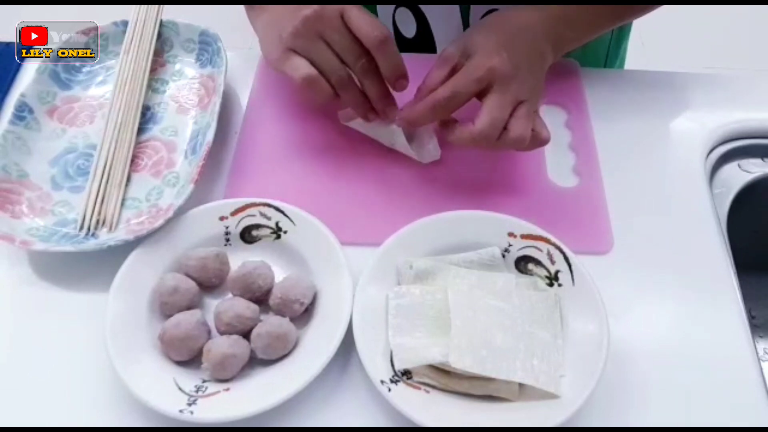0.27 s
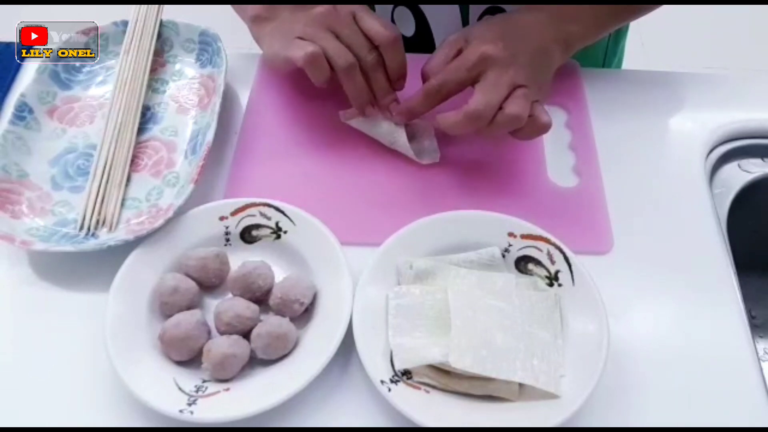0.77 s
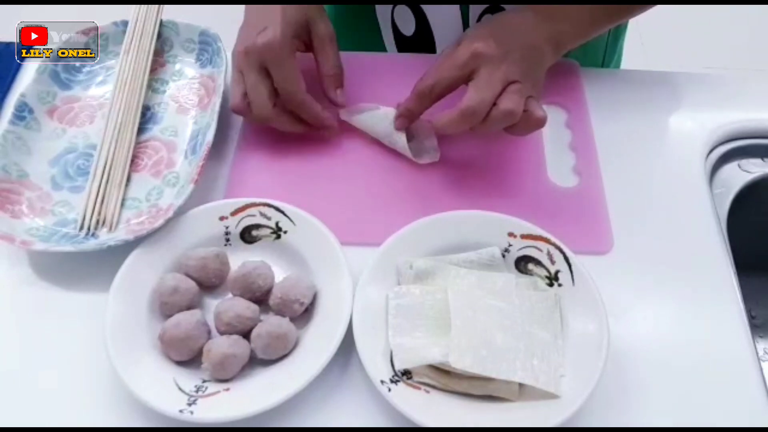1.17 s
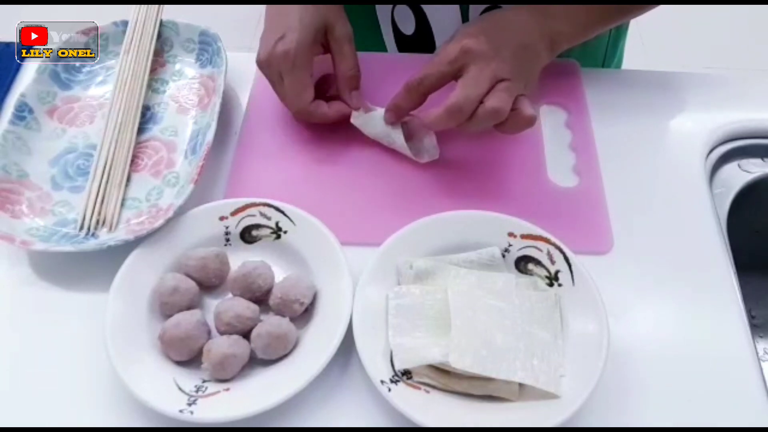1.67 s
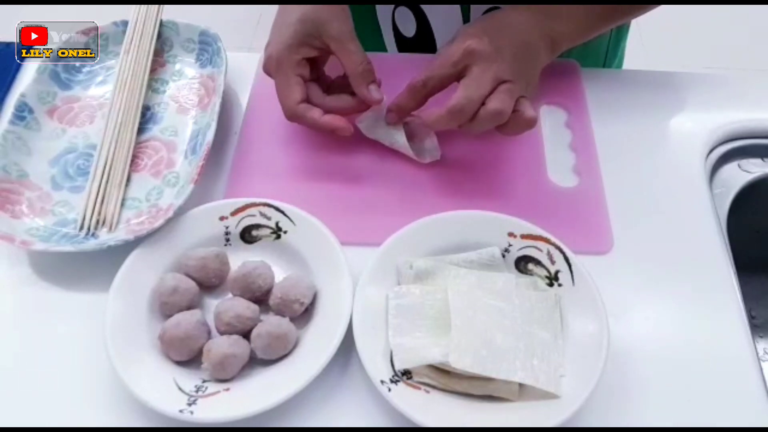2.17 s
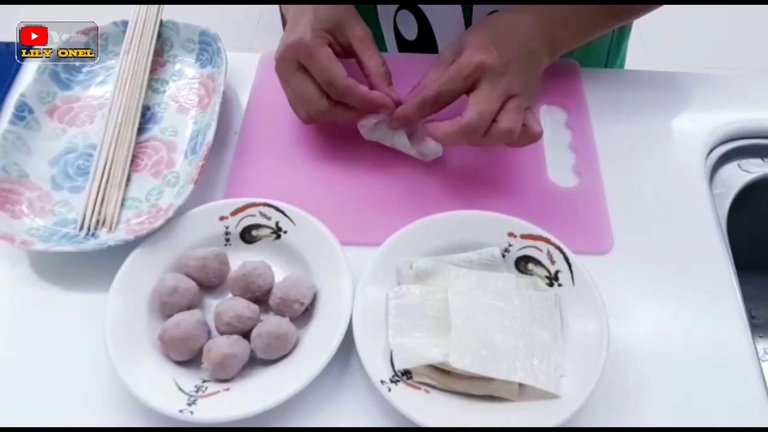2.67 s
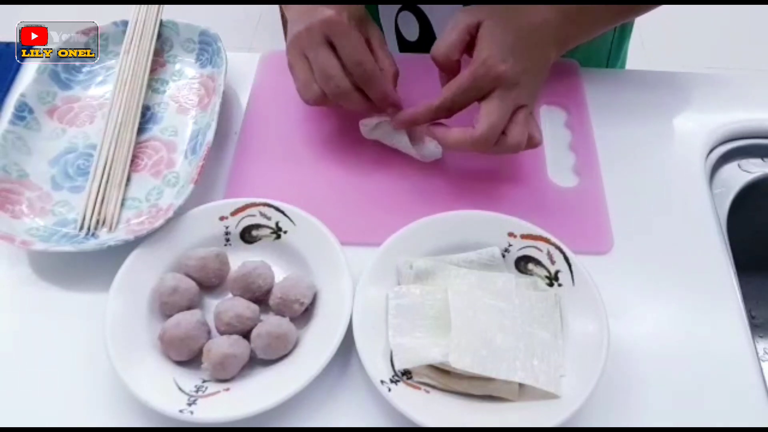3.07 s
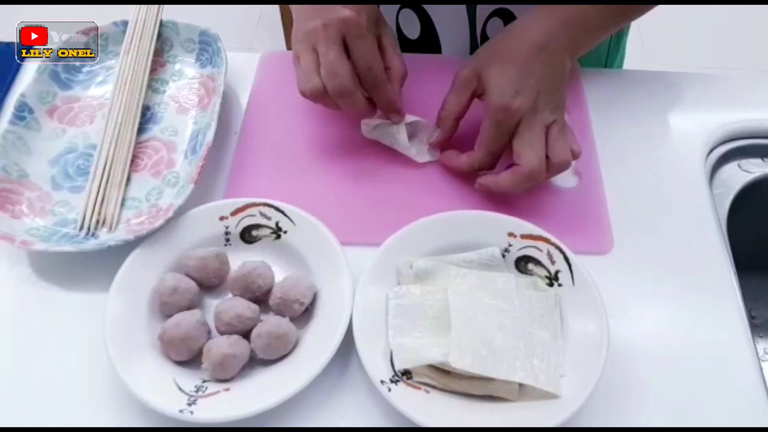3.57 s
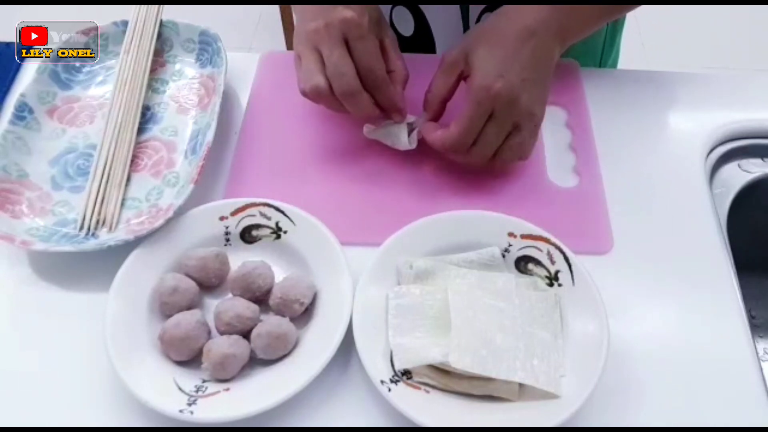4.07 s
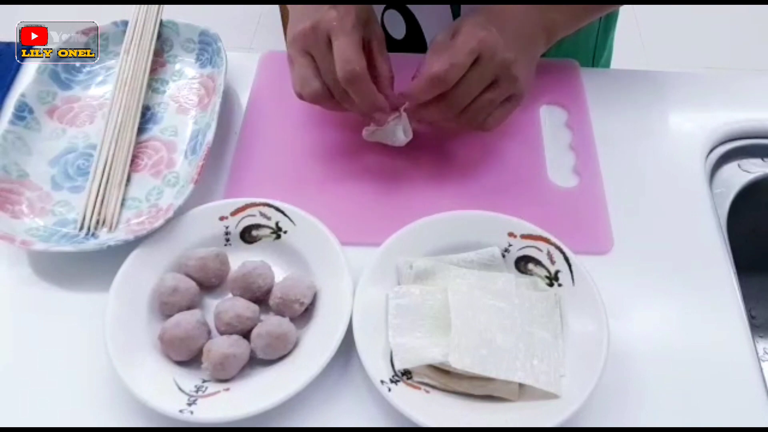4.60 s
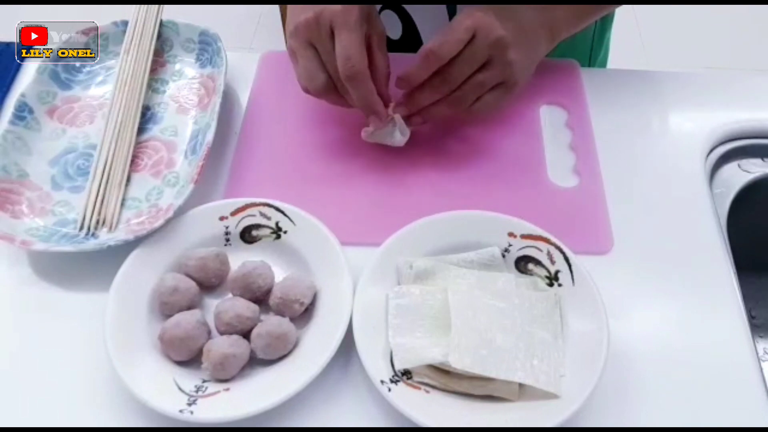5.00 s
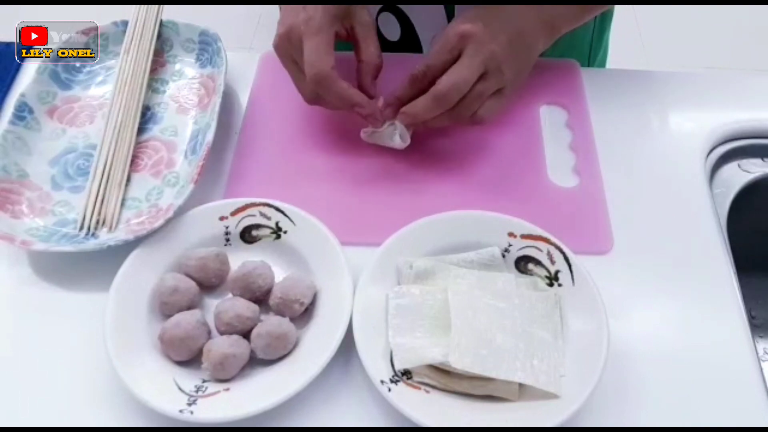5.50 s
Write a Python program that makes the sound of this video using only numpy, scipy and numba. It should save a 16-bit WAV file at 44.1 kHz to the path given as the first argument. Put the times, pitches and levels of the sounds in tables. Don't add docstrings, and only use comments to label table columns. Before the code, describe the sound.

Deep continuous fridge drone with a faint buzzy edge, broken by a few light bracelet taps on a counter and barely audible hand rustle.

```python
import sys
import numpy as np
from scipy import signal
from scipy.fft import rfft, irfft
from scipy.io import wavfile
from scipy.ndimage import uniform_filter1d
from numba import njit

SR = 44100
rng = np.random.default_rng(int(sys.argv[2]) if len(sys.argv) > 2 else 0)


def level_to_linear(level):
    exponent = np.asarray(level, float) / 20
    return 10 ** exponent


def digitize_waveform(pressure):
    field = np.atleast_2d(pressure).T
    bounded = np.clip(field, -1, 1)
    quanta = np.round(bounded * 32767).astype(np.int16)
    wavfile.write(sys.argv[1], SR, quanta)


N = 253310


def along(hz, table, column):
    rows = np.array(table)
    return np.interp(np.log(hz), np.log(rows[:, 0]), rows[:, column])


def swell(s, rise_s, fall_s):
    t = np.arange(N) / SR - s
    return np.where(t < 0, np.exp(-(t / rise_s) ** 2), np.exp(-np.abs(t) / fall_s))


def spread(pan_db):
    return level_to_linear(np.array([[pan_db], [-pan_db]]) / 2)


def tone(left_db, right_db, lead_rad, phase_rad, unrest, wander_hz=7.):
    marks = rng.standard_normal((2, 100))
    wander = 1 + unrest * (marks[0] + 1j * marks[1])
    start = np.sqrt(2) * np.exp(1j * phase_rad)
    left = start * level_to_linear(left_db)
    right = start * level_to_linear(right_db) * np.exp(1j * lead_rad)
    return wander, wander_hz / SR, left, right


@njit
def add(out, spin, wander, step, left, right):
    for i in range(len(spin)):
        j = int(i * step)
        z = spin[i] * (wander[j] + (wander[j + 1] - wander[j]) * (i * step - j))
        out[0, i] += (left * z).real
        out[1, i] += (right * z).real


def air(lag_s=0.000382):
    # Hz, left in dB per Hz, right in dB per Hz, likeness of the ports 0-1.
    broad = [(20, -75, -75, 0.7), (50, -65, -64, 1), (90, -65, -65, 0.95), (139, -60.5, -60, 1),
             (216, -66, -69, 0.9), (285, -77, -75, .9), (510, -82, -85, 0.4), (794, -83, -87.5, 0.6),
             (1040, -82, -86.5, 0.33), (1300, -83.5, -90, 0.1), (2090, -90, -91, 0), (3080, -97, -100, 0.6),
             (7560, -103, -107, 0), (15000, -100, -100, 0.2)]
    # Hz, width in Hz, left in dB per Hz, right in dB per Hz.
    resonances = [(106, 6, -50, -51), (140.5, 5, -54, -55), (146.8, 3, -52, -52), (158, 7, -52, -54),
                  (167, 6, -59, -61), (201, 7, -63, -63), (212, 6, -66, -66), (233, 12, -64, -68),
                  (254, 9, -64, -67), (277, 3, -68, -74), (322.5, 3, -62, -64), (328, 14, -67, -72),
                  (336, 3, -69, -78), (359.8, 2, -78, -65), (380, 30, -83, -76), (399, 14, -69, -74),
                  (450, 50, -80, -85), (555, 30, -81, -82), (630, 40, -80, -84), (580, 6, -72, -74),
                  (663.5, 4, -63.5, -73), (699, 4, -72, -80), (748, 5, -73, -82), (870, 40, -81, -86),
                  (1620, 160, -79, -96), (2330, 350, -89, -92), (3970, 500, -102, -102),
                  (6750, 830, -105, -104), (9200, 2300, -100, -99), (10000, 200, -89, -98.5)]
    hz = np.maximum(np.arange(N // 2 + 1) * SR / N, 1)
    power = [level_to_linear(along(hz, broad, c)) ** 2 for c in (1, 2)]
    for centre_hz, width_hz, *dbs in resonances:
        shape = 1 / (1 + (2 * (hz - centre_hz) / width_hz) ** 2) ** 1.35
        power = [p + level_to_linear(db) ** 2 * shape for p, db in zip(power, dbs)]
    like = np.clip(along(hz, broad, 3), 0, 1)
    mid, side = rfft(rng.standard_normal((2, N)))
    ports = np.sqrt(1 + like) * mid + np.sqrt(1 - like) * side * np.array([[1], [-1]])
    ports[1] *= np.exp(-2j * np.pi * hz * lag_s)
    return irfft(ports * np.sqrt(np.array(power) * SR / 4), N)


def mains():
    # Hz, left in dB, right in dB.
    magnetics = [(120, -50, -51), (240, -48, -51.5), (480, -64, -66), (600, -64, -66)]
    # Hz, left in dB, right in dB.
    blades = [(146.9, -43, -43), (277.4, -62, -72)]
    t, out = np.arange(N) / SR, np.zeros((2, N))
    for table, unrest in ((magnetics, .087), (blades, .22)):
        for hz, left_db, right_db in table:
            add(out, np.exp(2j * np.pi * hz * t), *tone(left_db, right_db, 0.11, 0, unrest))
    return out


def rustle(low_hz=2000., high_hz=9500., pan_db=4., grain_db=1.8, stir_db=4., stir_s=.07):
    # peak in seconds, peak in dB, fade in seconds.
    brushes = [
        (1.402, -54, .035),
        (1.455, -60, .01),
        (1.635, -57, .06),
        (3.805, -53, .01),
    ]
    bed_db, attack_s = -68 - 1.5, .01
    grains = rng.standard_normal((2, N)) * level_to_linear(grain_db * rng.exponential(size=(2, N)))
    band = signal.butter(2, [low_hz, high_hz], "bandpass", fs=SR, output="sos")
    hiss = signal.sosfilt(band, grains)
    hold = int(stir_s * SR)
    stir = np.repeat(rng.standard_normal(N // hold + 1), hold)
    stir = uniform_filter1d(stir, hold)[:N]
    level = level_to_linear(bed_db + stir_db * stir)
    level = level + sum(level_to_linear(db) * swell(s, attack_s, fade_s) for s, db, fade_s in brushes)
    return hiss / hiss.std() * level * spread(pan_db)


def cracks(pan_db=5., length_s=.0006):
    # time in seconds, peak in dB, Hz.
    snaps = [
        (1.3985, -38, 500),
        (1.4035, -45, 3000),
        (3.3092, -32, 500),
        (3.3096, -44, 2300),
        (3.8058, -40, 500),
        (3.8068, -39, 2250),
        (3.813, -45, 2400),
    ]
    t, out = np.arange(N) / SR, np.zeros(N)
    for s, db, hz in snaps:
        out -= level_to_linear(db) * np.exp(-((t - s) / length_s) ** 2) * np.cos(2 * np.pi * hz * (t - s))
    return out * spread(pan_db)


def touches():
    # start in seconds, peak in dB, centre in Hz, brightness in dB.
    knocks = [(1.237, -38, 930, 2), (1.307, -43, 1080, 0), (1.345, -42, 1070, 0), (1.3968, -23, 900, 3),
              (1.4185, -32, 640, -4), (1.425, -38, 620, -4), (1.432, -39, 1080, 4), (1.447, -43, 900, 0),
              (1.457, -40, 700, 0), (1.478, -43, 880, 0), (1.531, -37, 1050, -3), (1.537, -35, 1040, -3),
              (1.539, -38, 880, -3), (1.552, -40, 1050, -3), (1.569, -43, 950, -3), (1.582, -39, 960, -3),
              (1.589, -41, 980, -3), (1.596, -40, 1000, -3), (1.604, -35, 1030, -4), (1.610, -35, 1050, -4),
              (1.619, -41, 1600, 0), (1.624, -30.5, 1070, -3), (1.633, -37, 1070, 0),
              (1.6395, -30, 1060, -3), (1.650, -32.5, 1120, -2), (1.655, -38, 1130, -4),
              (1.667, -42, 1060, 0), (3.308, -34, 940, 2), (3.308, -39, 1700, 0), (3.347, -44, 950, 0),
              (3.384, -44, 950, 0), (3.396, -38, 980, 0), (3.410, -46, 1060, 0), (3.419, -40, 970, 0),
              (3.436, -43, 1040, 0), (3.660, -45, 1720, 0), (3.682, -44, 1720, 0), (3.708, -43, 1700, 0),
              (3.721, -43, 1050, 0), (3.765, -42, 1000, 0), (3.772, -43, 1030, 0), (3.780, -43, 950, 0),
              (3.790, -38, 980, 0), (3.8035, -33, 1540, -2), (3.8045, -29, 1050, 0), (3.810, -33, 1535, -2),
              (3.821, -44, 1000, 2), (3.873, -43, 1050, 2), (3.974, -43, 1090, 0)]
    s, db, hz, bright_db = max(knocks, key=lambda row: row[1])
    bounces = [(s + k * .0065, db - k * 2.2, hz + k * 55, bright_db - k * 1.5) for k in (1, 2, 3)]
    return knocks + bounces


def worktop(pan_db=5., lag_samples=9, tail_db=-13., touch_s=.0014, focus_hz=160.):
    # Hz, level in dB, t60 in seconds, share of the brightness 0-1.
    modes = [(400, -3, 0.05, 1), (536, -7.5, 0.11, 0.3), (656, -7, 0.12, 1), (820, -4, 0.03, 0),
             (900, -1.5, 0.045, 0.2), (980, -2, .05, .1), (1150, -5, 0.04, 0.2), (1050, -1, 0.06, 0),
             (1112, -3, 0.045, 0.1), (1530, 0, 0.06, 1), (1720, -1, 0.05, 0.6), (2260, -10, 0.035, 1),
             (310, -2, .06, 0)]
    board_db, bead_t60_s = -7, .036
    t, dry = np.arange(SR // 6) / SR, np.zeros(N + SR)
    hz, mode_db, t60_s, share = np.transpose(modes)[:, :, None]
    for s, db, centre_hz, bright_db in touches():
        a, b, c = rng.standard_normal((3, len(modes), 1))
        near_db = board_db - np.minimum(6 * ((hz - centre_hz) / focus_hz) ** 2, 8)
        level_db = mode_db + near_db + share * bright_db + .5 * a - 60 * t / t60_s
        board = level_to_linear(level_db) * np.sin(2 * np.pi * hz * (1 + 0.015 * b) * t + 3 * c)
        bead = level_to_linear(-60 * t / bead_t60_s) * np.sin(2 * np.pi * centre_hz * t)
        ring = (board.sum(axis=0) + bead) * (1 - np.exp(-(t / touch_s) ** 2))
        first = int(s * SR)
        dry[first:first + len(t)] += level_to_linear(db) * ring / np.abs(ring).max()
    tail = rng.standard_normal((2, len(t))) * level_to_linear(-60 * t / .2) * (t > .004)
    tail = level_to_linear(tail_db) * tail / np.sqrt(np.sum(tail ** 2, axis=1, keepdims=True))
    direct = np.array([dry, np.roll(dry, lag_samples)]) * spread(pan_db)
    room = signal.fftconvolve(dry[None], tail, axes=1)[:, :len(dry)]
    return (direct + room)[:, :N]


def shaft():
    # rate in Hz, swing in rad, start in rad.
    surge = (1.5, 0.0105, 2.35)
    shaft_hz, sag_hz_per_s = 59.2823, .0033
    surge_hz, swing_rad, start_rad = surge
    t = np.arange(N) / SR
    angle = 2 * np.pi * np.cumsum(shaft_hz - sag_hz_per_s * t) / SR
    angle = angle + swing_rad * np.sin(2 * np.pi * surge_hz * t + start_rad)
    return np.exp(1j * angle)


def damping():
    # peak in seconds, depth in dB, press in seconds, release in seconds.
    leans = [
        (2.47, -2, 0.033, 0.22),
        (3.57, -1, .3, 0.015),
        (4.95, 0.5, 0.089, .15),
    ]
    # time in seconds, depth 0-1, length in seconds.
    jolt = (3.586, .85, .011)
    jolt_s, depth, length_s = jolt
    t = np.arange(N) / SR
    boom_db = sum(db * swell(s, press_s, release_s) for s, db, press_s, release_s in leans)
    choke = 1 - depth * np.exp(-((t - jolt_s) / length_s) ** 2)
    return level_to_linear(boom_db - boom_db.mean()) * choke


def compressor(scatter_db=3., under_db=-1.5, bend_rad=.7, smear_rad=.24):
    # multiple of the shaft, left in dB, right in dB, right leads in rad.
    cabinet = [(1, -30, -32, -0.2), (2, -47, -51, -0.2), (3, -41, -40, -0.7), (4, -55, -59, -0.5),
               (5, -60, -61, 2.7), (6, -54, -55, -0.3), (7, -56, -63, -2.8), (8, -57, -63, -0.4),
               (9, -55, -53, 0.3), (10, -55, -55, -3.0), (11, -61, -56, 0.7), (12, -63, -62, -3.1),
               (13, -80, -72, -0.3), (14, -73, -71, 3.1), (15, -52, -56, -2.9), (16, -85, -65, 2.1),
               (17, -65, -72, -2.4), (18, -58, -60, -2.3), (19, -63, -65, 2.2), (20, -69, -85, -2.0),
               (21, -57, -72, -2.5), (22, -55.5, -71, -2.3)]
    # multiple of the shaft, left in dB, right in dB, right leads in rad.
    shell = [(23, -66, -76, -2.3), (24, -71, -72, 1.0), (25, -62.5, -79, -0.6), (26, -52, -70, 0.9),
             (27, -60, -63, -0.9), (28, -50.5, -71, -2.8), (29, -60, -58, 2.8), (30, -65, -74, 0.6),
             (31, -73, -71, 0.1), (32, -62, -75, -0.2), (33, -65, -78, -2.2), (34, -62, -82, 2.2),
             (35, -80, -69, 3.0), (36, -71, -76, 1.3), (37, -68, -74, -2.5), (38, -64, -70, 0.1),
             (39, -63, -72, -0.1), (40, -64, -63, -0.5), (41, -66, -66, 0.5), (42, -65, -73, 1.5),
             (43, -76, -81, 1.2), (44, -73, -83, -1.7), (45, -69, -76, -1.3), (46, -72, -78, 1.5),
             (47, -68, -77, -1.4), (48, -73, -80, 0), (49, -77, -75, 1)]
    # multiple of the shaft, left in dB, right in dB, right leads in rad.
    whistles = [(57, -72, -79, 2.9), (84, -72, -95, 1.4), (98, -70, -82, .7), (102, -73, -88, -3.1),
                (110, -74, -89, 1.), (121, -75, -88, 0), (128, -74, -99, .1), (169, -68, -78, -2.6),
                (170, -77, -81, 1.5), (186, -79, -78, 1.7)]
    # Hz, left in dB, right in dB.
    rattle = [(2820, -75, -75), (3200, -80, -76), (3500, -75, -77), (3900, -75, -86), (4300, -81, -80),
              (4700, -82, -88), (4900, -76, -87), (5650, -75, -81), (6500, -75, -84), (7600, -73, -90),
              (7800, -82, -90), (8500, -80, -84), (9400, -81, -80), (10300, -85, -90), (12400, -85, -90)]
    known = {row[0]: row[1:] for row in cabinet + shell + whistles}
    turn, boom = shaft(), damping()
    spin, out = np.ones(N), np.zeros((2, N))
    for k in range(1, 216):
        spin = spin * turn
        luck = rng.standard_normal(3)
        tops_db = [along(k * 59.2823, rattle, c) + under_db + scatter_db * min(luck[c], 1) for c in (1, 2)]
        left_db, right_db, lead_rad = known.get(k, (*tops_db, 3 * luck[0]))
        phase_rad = 3 * luck[1]
        if shell[0][0] <= k <= shell[-1][0]:
            phase_rad = bend_rad * (k - 27) ** 2 + smear_rad * (k - 27) ** 3
        unrest = min(.015 + .012 * k, .11 if k < 36 else .26)
        line = spin * boom if k == 1 else spin
        add(out, line, *tone(left_db, right_db, lead_rad, phase_rad, unrest))
    return out


def scene():
    return compressor() + mains() + air() + worktop() + cracks() + rustle()


def roll_off(x):
    return signal.sosfilt(signal.butter(12, 15505, fs=SR, output="sos"), x)


def record(dry):
    # Hz, width in Hz, left in dB, right in dB.
    dips = [(1960, 90, 0, -5), (2080, 50, -4, 0), (3900, 250, 0, -3), (4500, 250, -2.5, 0),
            (5200, 200, 0, -6), (6600, 500, 0, -3), (7300, 300, 0, -3), (7750, 250, -1, -13),
            (8800, 400, -2, 0), (10250, 150, -4, -4), (13900, 700, -1.5, -1.5), (15350, 150, -1, -1)]
    top_hz = 15505
    hz = np.arange(N // 2 + 1) * SR / N
    dips_db = np.zeros((2, len(hz)))
    for centre_hz, width_hz, *dbs in dips:
        dips_db += np.array(dbs)[:, None] * np.exp(-((hz - centre_hz) / width_hz) ** 2)
    mix = irfft(rfft(dry) * level_to_linear(dips_db) * (hz < top_hz), N)
    return roll_off(mix)


dry = scene()
out = record(dry)
digitize_waveform(out)
```